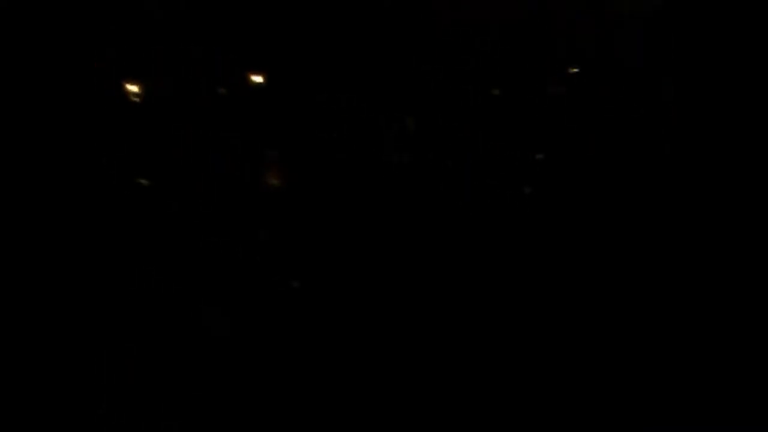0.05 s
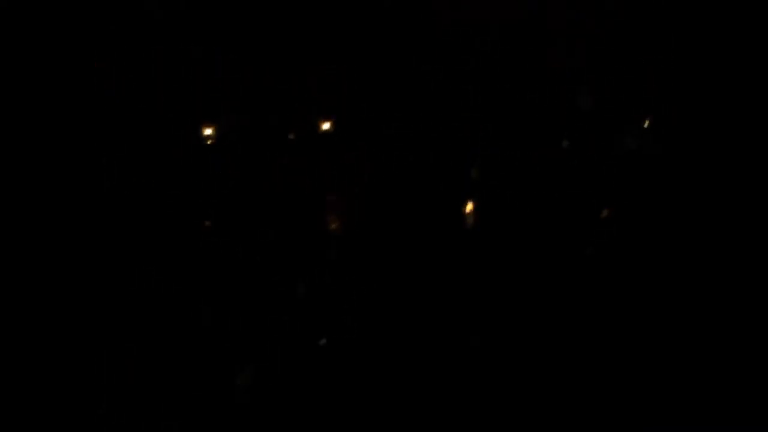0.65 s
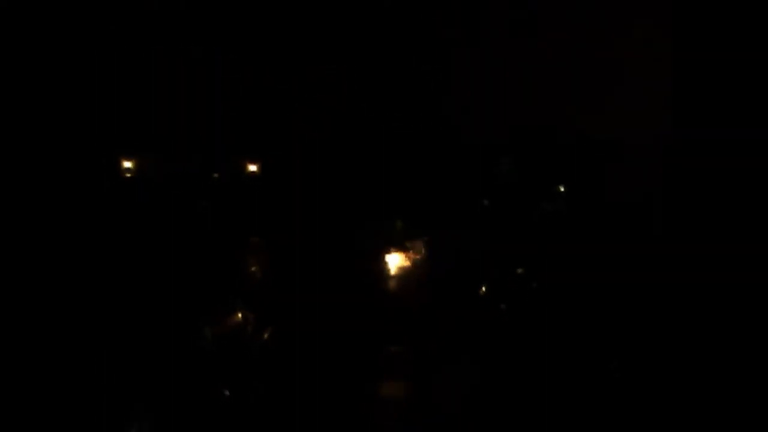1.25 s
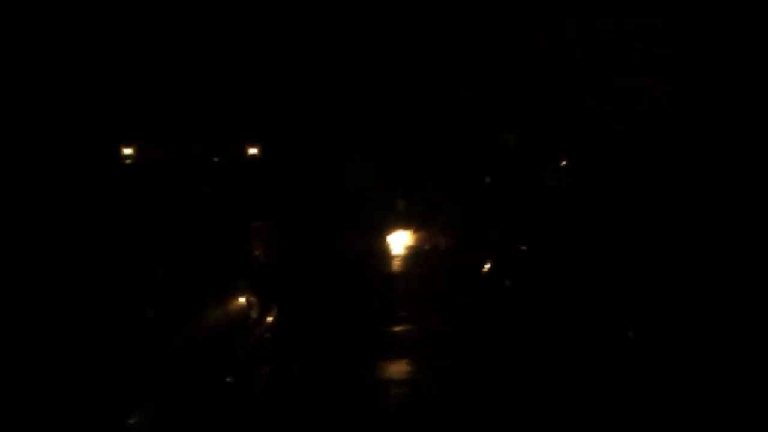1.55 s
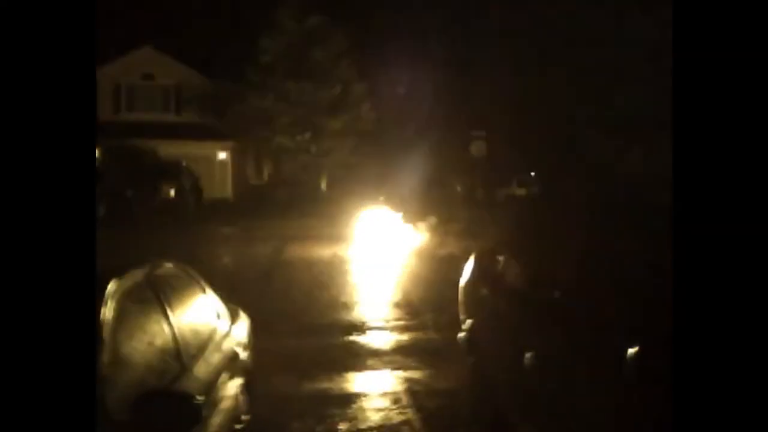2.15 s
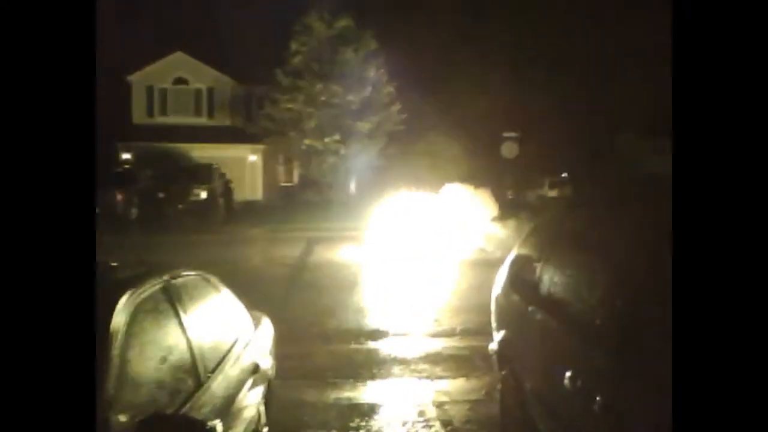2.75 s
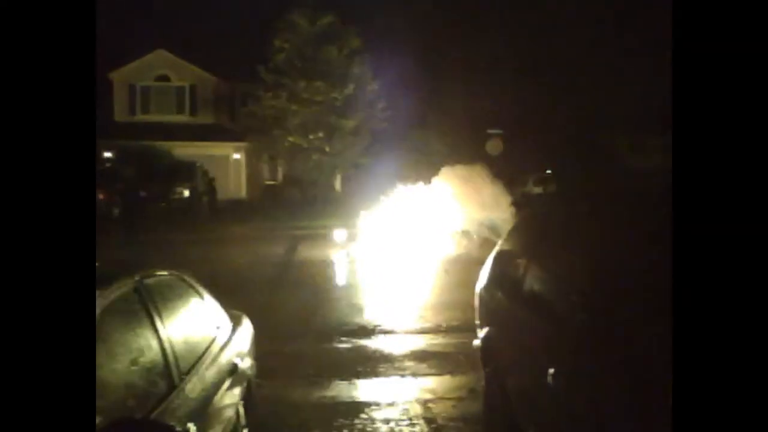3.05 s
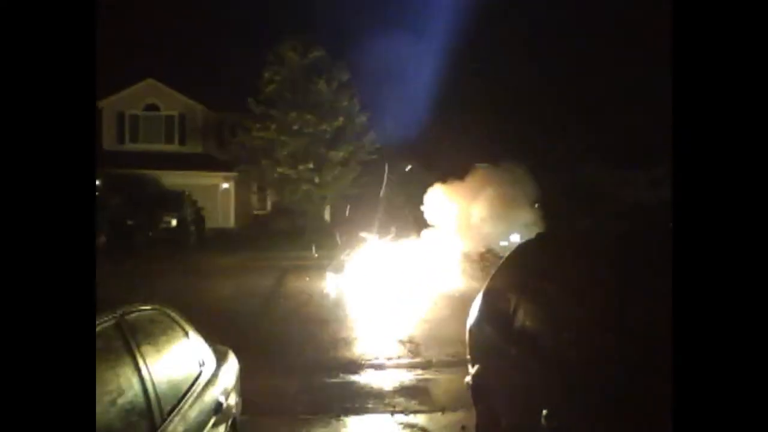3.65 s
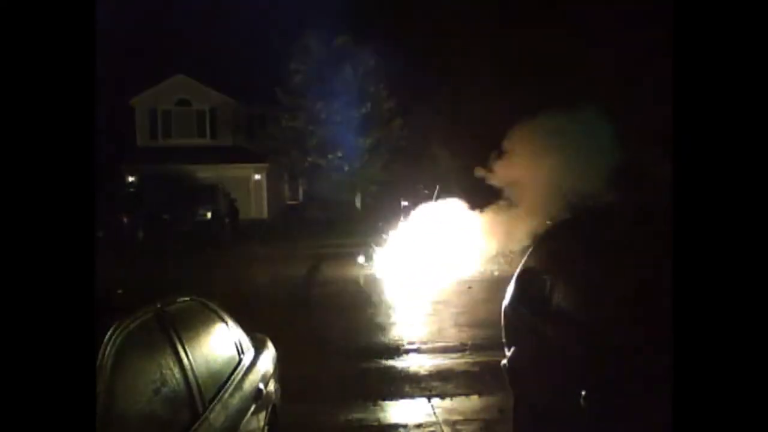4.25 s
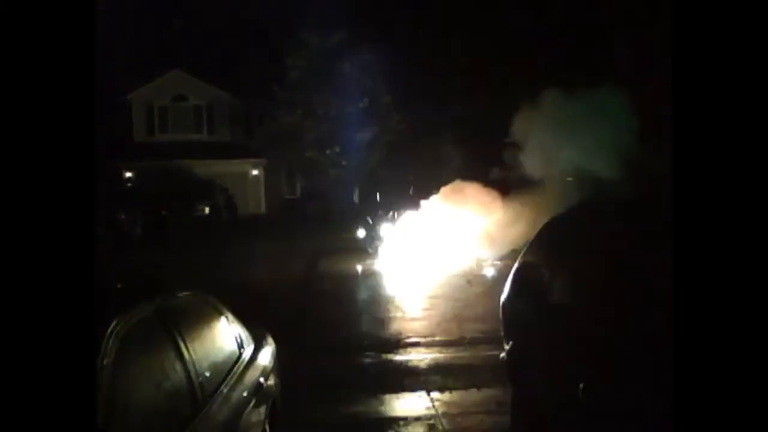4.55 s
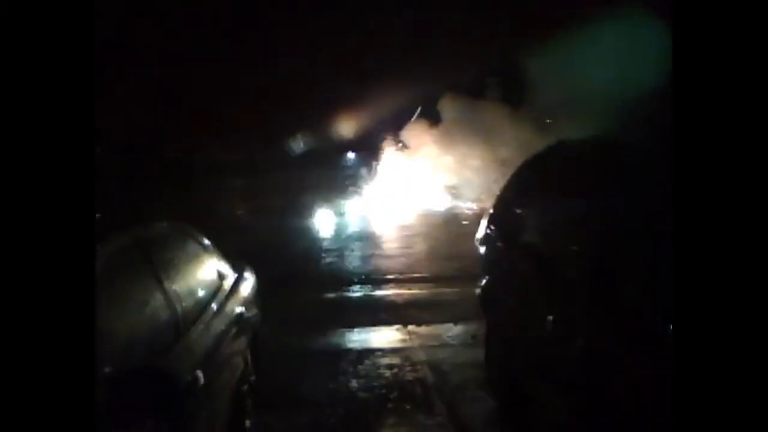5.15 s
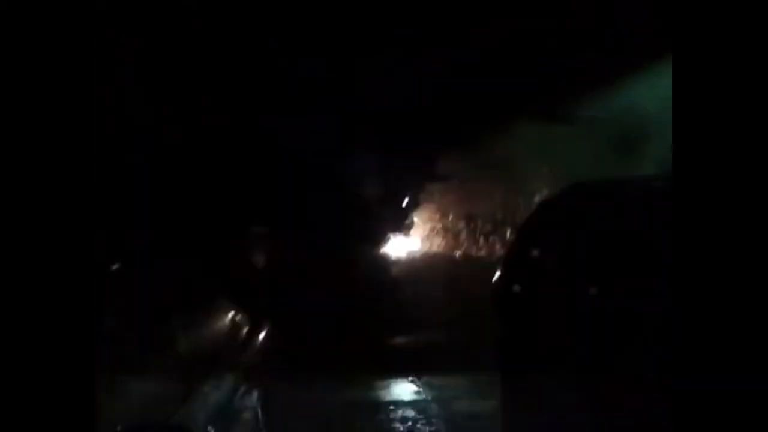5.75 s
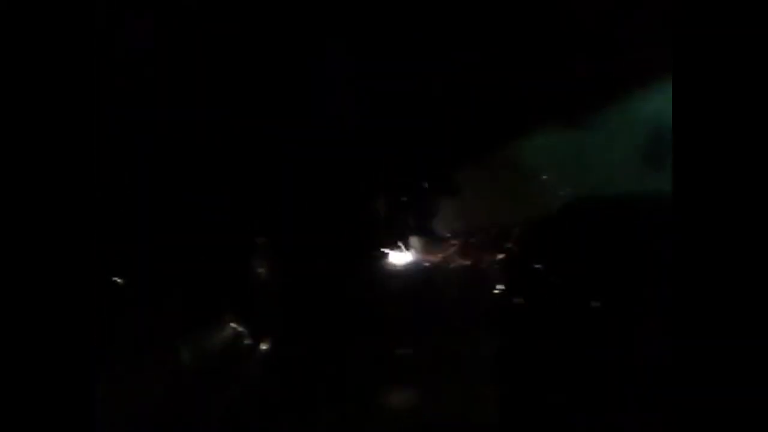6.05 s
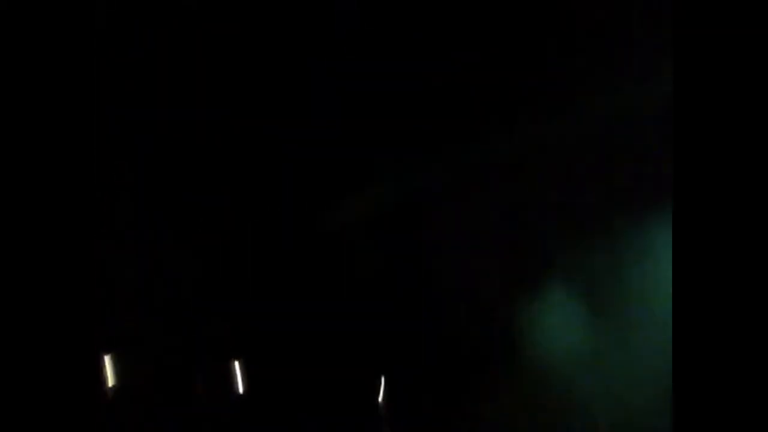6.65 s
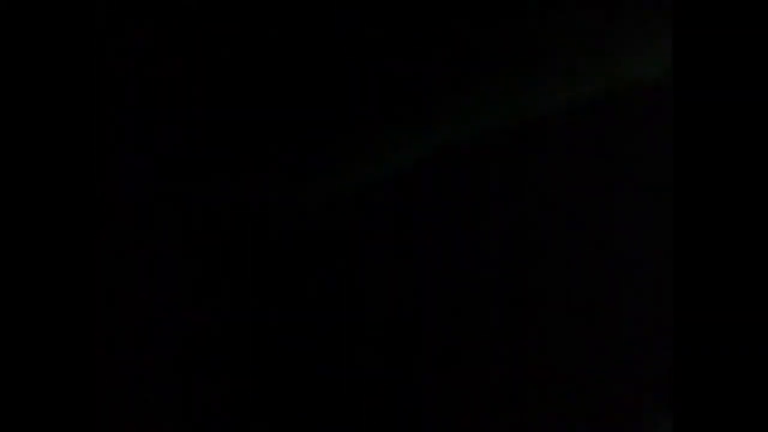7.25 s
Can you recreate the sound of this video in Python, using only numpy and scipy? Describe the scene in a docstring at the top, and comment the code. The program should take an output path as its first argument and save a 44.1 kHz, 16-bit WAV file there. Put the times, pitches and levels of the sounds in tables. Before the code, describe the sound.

In the first second, fingers lightly rub and knock a hand-held mono microphone over faint night air, with one sharper knock near 0.8 seconds. From 1 second, a ground firework close by gives scattered dry snaps that grow louder and thicken. By 2.7 seconds they merge into a loud, dense crackling roar that overloads the microphone and holds until about 5.3 seconds. One brief whistle cuts through near 3.7 seconds, and low wind buffets come and go. From 5 seconds, short, shrill, raspy whistles follow one after another, each falling slightly in pitch. Larger pops cluster between 5.4 and 6 seconds as the crackle dies away. Weaker whistles, a few sharp cracks and small pops continue over thin crackle and a faint rumble until about 7.4 seconds. The bursts and whistles echo briefly off house fronts along the street.

```python
"""A ground firework burns close by on a suburban street at night: single grains snap, then thicken
into a crackling roar. As it thins, whistling tubes fire one after another, each falling in pitch as
its fuel burns down the bore, and larger charges pop. House fronts throw the sound back.
Wind and fingers disturb the hand-held mono microphone, and its amplifier overloads hard.
A faint rumble lies under the last whistles."""
import sys
import numpy as np
from scipy import signal
from scipy.fft import rfft, irfft
from scipy.io import wavfile
from scipy.ndimage import map_coordinates

SR = 44100
rng = np.random.default_rng(int(sys.argv[2]) if len(sys.argv) > 2 else 0)


def to_wav(s):
    """Save 16-bit WAV."""
    ch = np.atleast_2d(s).T  # columns
    pcm = np.round(np.clip(ch, -1, 1) * 32767)  # PCM
    wavfile.write(sys.argv[1], SR, pcm.astype(np.int16))


N = 322812
TIME = np.arange(N) / SR


def from_db(db):
    """Decibels to gain."""
    return 10 ** (np.asarray(db) / 20)


def add(track, start_s, sound):
    """Mix a short sound into a track."""
    start = int(np.clip(round(start_s * SR), 0, N - 1))
    track[start:start + len(sound)] += sound[:N - start]


def swell(centre_s, width_s):
    """Gaussian bump of height 1."""
    return np.exp(-np.minimum((2 * (TIME - centre_s) / width_s) ** 2, 20))


def drift(rate_hz):
    """Ramps between random values, spread about 1."""
    return map_coordinates(rng.standard_normal(N // 8), [TIME * rate_hz], order=1, mode="wrap")


def coloured(x, spectrum, size=4096):
    """Minimum-phase filter from (Hz, dB) rows; white noise keeps its power."""
    hz, db = np.transpose(spectrum)
    grid_hz = np.maximum(np.fft.rfftfreq(size, 1 / SR), 1)
    gain = from_db(np.interp(np.log(grid_hz), np.log(hz), db))
    cepstrum = irfft(np.log(gain))
    cepstrum[1:size // 2] *= 2
    cepstrum[size // 2 + 1:] = 0
    response = irfft(np.exp(rfft(cepstrum)))
    return signal.oaconvolve(x, response / np.linalg.norm(response))[:N]


def noise(spectrum):
    """Steady coloured noise of rms 1."""
    return coloured(rng.standard_normal(N), spectrum)


def ring(clicks, hz, t60_s):
    """Resonator: a unit click starts a decaying sine of height 1."""
    radius, angle = from_db(-60 / (t60_s * SR)), 2 * np.pi * hz / SR
    return signal.lfilter([0, np.sin(angle)], [1, -2 * radius * np.cos(angle), radius ** 2], clicks + 1e-18)


def burst(t60_s, size):
    """Noise decaying from rms 1."""
    return rng.standard_normal(size) * from_db(-60 * TIME[:size] / t60_s)


# Night air. Each row: frequency in Hz, level in dB.
NIGHT_SPECTRUM = [(25, -46), (80, -23), (170, -9), (400, -10), (800, -8), (1500, -12.5), (3000, -16),
                  (6000, -23), (10000, -29), (16000, -40)]

def night_air(level_db=-51):
    """Faint, steady outdoor noise."""
    return from_db(level_db) * noise(NIGHT_SPECTRUM)


# Knocks on the case. Each row: start in seconds, level in dB.
CASE_KNOCKS = [(0.023, -23.5), (0.0793, -12.5), (0.301, -25), (0.386, -19.5), (0.7562, -3), (0.991, -27)]
# Case resonances. Each row: frequency in Hz, level in dB, T60 in seconds.
CASE_MODES = [(1020, -13.5, 0.012), (1370, -11, 0.01), (1840, -8.5, 0.021), (3180, -15, 0.0055),
              (4730, -9, 0.0029)]
# Finger slides. Each row: centre in seconds, width in seconds, rub in dB, swish in dB.
FINGER_SLIDES = [(0.17, 0.077, -36, -48), (0.257, 0.042, -45, -50), (0.418, 0.12, -44, -48),
                 (0.578, 0.043, -47, -60), (0.651, 0.15, -45.5, -43), (0.845, 0.11, -54, -49)]
# Dull rub and bright swish. Each row: frequency in Hz, level in dB.
RUB_SPECTRUM = [(500, -14), (1000, -8), (1500, 0), (1900, 2.5), (2400, -7), (3500, -22), (6000, -28)]
SWISH_SPECTRUM = [(2000, -10), (3200, -3), (4300, 6), (5600, -7), (6600, -6), (8200, -15), (10200, -17),
                  (12000, -21), (15000, -30)]

def handling(bump_s=0.194, bump_db=-15.5, grit_db=3.0):
    """The hand knocks, softly bumps and rubs the microphone's case."""
    clicks, push = np.zeros(N), np.zeros(N)
    for start_s, db in CASE_KNOCKS:
        add(clicks, start_s, from_db([db]))
    knocks = sum((-1) ** k * from_db(db) * ring(clicks, hz, t60_s)
                 for k, (hz, db, t60_s) in enumerate(CASE_MODES))
    add(push, bump_s, from_db([bump_db]))
    bump = ring(push, hz=236, t60_s=0.0073)
    rub, swish = noise(RUB_SPECTRUM), noise(SWISH_SPECTRUM)
    slides = sum(swell(centre_s, width_s) * (from_db(rub_db) * rub + from_db(swish_db) * swish)
                 for centre_s, width_s, rub_db, swish_db in FINGER_SLIDES)
    return knocks + bump + slides * from_db(grit_db * drift(rate_hz=151.7))


# Low rumbles. Each row: centre in seconds, relative level in dB, width in seconds.
LOW_RUMBLES = [(3.632, -16, 0.042), (3.728, 2, 0.024), (3.769, -4, 0.027), (4.064, -8.5, 0.026),
               (4.89, -9.5, .026), (5.36, -5, 0.038), (5.899, -19, 0.056), (5.987, -6, 0.035),
               (6.046, -3, 0.0098), (6.442, -22.5, 0.083), (6.817, -28, 0.17), (7.23, -34, 0.11)]
# Rumble colour. Each row: frequency in Hz, level in dB.
RUMBLE_SPECTRUM = [(15, -4), (50, 6.5), (100, 1), (170, -6.5), (400, -29), (1500, -36)]

def rumbles(level_db=-2):
    """Low rumbles: wind buffets at the microphone, then faint rumbling under the last whistles."""
    envelope = sum(from_db(db + level_db) * swell(centre_s, width_s)
                   for centre_s, db, width_s in LOW_RUMBLES)
    return envelope * noise(RUMBLE_SPECTRUM)


# Echoes off ground, cars and house fronts. Each row: delay in seconds, relative level in dB.
STREET_ECHOES = [(.0035, -28), (.021, -17.5), (.052, -23.5), (.083, -28.5), (.128, -23)]
# Colour of the echoes and tail. Each row: frequency in Hz, level in dB.
STREET_SPECTRUM = [(40, -15), (200, 1), (600, 2.5), (1800, 4), (3200, -0.5), (5000, -1.5), (9000, -5),
                   (16000, -29)]

def street(x, scatter_db=-17, tail_db=-16, houses_db=-4):
    """Bright scatter from nearby things, then duller echoes and a long tail from the houses."""
    near, tail = burst(t60_s=0.19, size=SR), burst(t60_s=1.0, size=SR)
    scatter = signal.fftconvolve(x, from_db(scatter_db) * near / np.linalg.norm(near))[:N]
    response = from_db(tail_db) * tail / np.linalg.norm(tail)
    for delay_s, db in STREET_ECHOES:
        response[int(delay_s * SR)] += from_db(db)
    houses = coloured(signal.fftconvolve(x, response)[:N], STREET_SPECTRUM)
    return scatter + from_db(houses_db) * houses


# Popping charges. Each row: start in seconds, relative level in dB, T60 in seconds.
POP_CHARGES = [(5.416, 10, 0.06), (5.524, 1.5, 0.085), (5.661, 2, 0.12), (5.749, -4, 0.05),
               (5.883, 12, 0.023), (5.957, 6.5, 0.23), (6.04, 9.5, 0.044), (6.350, 1.5, 0.017),
               (6.711, -1, 0.021), (6.835, -3.5, 0.049), (7.181, -6, 0.021)]
# Gas blast. Each row: frequency in Hz, level in dB.
POP_SPECTRUM = [(30, -32), (120, -5), (500, 0.5), (1000, 1.5), (1700, 2.5), (2600, 0.5), (5000, -5),
                (15000, -28)]

def pops(level_db=-3):
    """Larger charges go off with a dull blast of gas."""
    blasts = np.zeros(N)
    for start_s, db, t60_s in POP_CHARGES:
        add(blasts, start_s, from_db(db + level_db) * burst(t60_s, size=16384))
    return coloured(blasts, POP_SPECTRUM)


# Whistling tubes; the shortest are duds. Each row: start in seconds, length in seconds, top and bottom
# of the pitch sag in Hz, chirp time constant in seconds, relative level in dB, fade over the burn in dB.
WHISTLE_TUBES = [(3.66, 0.2, 3074, 2764, 0.0029, -3.5, 5.5), (4.957, 0.16, 3063, 2657, 0.0037, 4.5, 7),
                 (5.02, 0.34, 3162, 2660, 0.0018, 0.5, 4), (5.354, 0.25, 3002, 2577, 0.0029, 3.5, 18),
                 (5.53, 0.32, 3176, 2538, 0.0029, 1, 16), (5.878, .28, 3032, 2773, .009, 2, 16.5),
                 (6.127, 0.035, 3180, 2990, .002, -10, 5), (6.357, .345, 3080, 2540, 0.00202, 0, 12.5),
                 (6.6345, 0.0082, 3490, 3200, 0.0047, -3, 16), (6.714, 0.25, 3145, 2689, 0.0036, -7.5, -2),
                 (6.843, 0.32, 3086, 2623, 0.0018, -3.5, 10), (7.189, .2, 3157, 2707, 0.0085, -1, 5)]
# Gas hiss at a tube's mouth. Each row: frequency in Hz, level in dB.
JET_SPECTRUM = [(200, -18), (1500, -8), (3000, -3), (4500, 4), (6500, 7.5), (10000, -0.5), (16000, -16)]

def whistles(level_db=-2, jet_db=-22, overtones_db=(-14, -21, -28, -35), flutter_db=5, edge_s=0.0033,
             chirp_hz=465, sag_curve=0.8, burnout_share=0.17, burnout_hz=350, burnout_db=-1):
    """Each tube sings at its quarter-wave pitch, which falls as the fuel retreats down the bore."""
    out = np.zeros(N)
    bend = 0.008 * drift(rate_hz=35) + 0.006 * drift(rate_hz=140) + 0.0173 * drift(rate_hz=1500)
    flutter = from_db(flutter_db * drift(rate_hz=150))
    overtone_gains = [from_db(db + flutter_db * drift(rate_hz=130)) for db in overtones_db]
    jet = from_db(jet_db) * noise(JET_SPECTRUM)
    for k, (start_s, length_s, top_hz, bottom_hz, settle_s, db, fade_db) in enumerate(WHISTLE_TUBES):
        t = TIME[TIME < length_s]
        own = slice(k * SR // 2, k * SR // 2 + len(t))   # each tube burns unevenly in its own way
        burnt = t / length_s
        burnout = np.clip(1 - (1 - burnt) / burnout_share, 0, 1) ** 2
        sag_hz = top_hz + (bottom_hz - top_hz) * burnt ** sag_curve
        hz = sag_hz + chirp_hz * np.exp(-t / settle_s) + burnout_hz * burnout
        phase = 2 * np.pi * np.cumsum(hz * (1 + bend[own])) / SR
        rasp = sum(gain[own] * np.sin(n * phase) for n, gain in enumerate(overtone_gains, 2))
        tone = flutter[own] * np.sin(phase) + rasp
        gate = np.clip(np.minimum(t, length_s - t) / edge_s, 0, 1)
        envelope = gate * from_db(level_db + db - fade_db * burnt + burnout_db * burnout)
        add(out, start_s, (tone + jet[own]) * envelope)
    return out


def crack(scatter_db=-21):
    """One grain bursts: a ragged shock and a little scatter, with the energy of 4 ms at rms 1."""
    shock = burst(t60_s=0.003, size=1024) + from_db(scatter_db) * burst(t60_s=0.038, size=1024)
    return shock / np.linalg.norm(shock) * np.sqrt(0.004 * SR)


# Loudest single grains. Each row: start in seconds, level in dB.
LONE_GRAINS = [(1.0196, -37), (1.0312, -17), (1.0822, -28.5), (1.2152, -22), (1.2467, -19), (1.2607, -28),
               (1.2693, -17.5), (1.3242, -29), (1.3454, -24), (1.373, -14.5), (1.3916, -20),
               (1.4513, -30.5), (1.5384, -24.5), (1.5613, -30), (1.6313, -22.5), (1.6715, -18.5),
               (1.693, -4.5), (1.7736, -10.5), (1.7842, -15), (1.797, -12), (1.8598, -21), (1.8778, -9),
               (1.9064, -2.5), (1.9491, -5), (2.0274, -20), (5.8292, -1), (6.127, 4), (6.383, -2),
               (6.637, -2.5), (7.298, -9.5)]
# Lone grain's report. Each row: frequency in Hz, level in dB.
SNAP_SPECTRUM = [(40, -29), (150, -8.5), (330, -10), (600, -0.5), (800, -6), (1450, 0.5), (2300, -1),
                 (2850, -4), (3500, 4), (4800, -1.5), (5700, 1), (8000, -4), (11000, -9), (16000, -12.5)]

def snaps(ring_db=-27, median_hz=3200):
    """Lone grains burst, each a sharp report with a brief pitch of its own."""
    reports = np.zeros(N)
    for start_s, db in LONE_GRAINS:
        shock = crack()
        hz = np.clip(median_hz * 2 ** rng.standard_normal(), 900, 9000)
        report = shock + from_db(ring_db) * ring(shock, hz, t60_s=0.0075)
        report *= np.linalg.norm(shock) / np.linalg.norm(report)
        add(reports, start_s, from_db(db) * report)
    return coloured(reports, SNAP_SPECTRUM)


# The shower catches, roars and burns down.
# Each row: time in seconds, base rate in grains per second, relative grain level in dB.
SHOWER_CURVE = [(0.96, 0, -41), (1.1, 300, -44), (1.64, 344, -40), (1.72, 456, -32), (2.02, 806, -23),
                (2.12, 800, -13), (2.47, 954, -8), (2.75, 1649, 0), (4.35, 1746, 1.5), (5.3, 745, 2.5),
                (5.45, 600.5, -2), (5.68, 500, -8.5), (5.8, 450, -17.5), (6.12, 487, -18), (6.2, 200, -37),
                (6.34, 150, -51), (6.42, 1124, -32), (7.32, 904, -43)]
# Flares as the flame catches. Each row: centre in seconds, boost in dB.
FLAME_FLARES = [(2.18, 11), (2.255, 1.5), (2.319, 12), (2.385, 10)]
# Massed grains. Each row: frequency in Hz, level in dB.
SHOWER_SPECTRUM = [(40, -12), (170, -11), (540, -3.5), (740, -5.5), (850, -2.5), (1000, -4), (1400, -2),
                   (2400, -1.5), (3450, 3.5), (4300, -1.5), (5500, 0.5), (7500, -4.5), (11000, -8.5),
                   (16000, -18)]

def shower(level_db=-8, spread_db=7, clumping_db=2, flare_width_s=0.019, shape_count=144):
    """Grains of varied size and shape burst at random, in clumps, merging into a roar."""
    times_s, rates, levels_db = np.transpose(SHOWER_CURVE)
    grains_per_s = np.interp(TIME, times_s, rates)
    grain_db = level_db + np.interp(TIME, times_s, levels_db)
    grain_db += sum(db * swell(centre_s, flare_width_s) for centre_s, db in FLAME_FLARES)
    fires = rng.random(N) < grains_per_s * from_db(clumping_db * drift(rate_hz=45)) / SR
    grain_db += spread_db * np.clip(rng.standard_normal(N), -2, 2)
    signed_gain = from_db(grain_db) * rng.choice([-1, 1], N)
    shapes = [crack() for _ in range(shape_count)]
    shape_index = rng.integers(0, shape_count, N)
    grains = np.zeros(N)
    for i in np.flatnonzero(fires):
        add(grains, i / SR, signed_gain[i] * shapes[shape_index[i]])
    return coloured(grains, SHOWER_SPECTRUM)


def scene(whistle_send_db=4, beaming_hz=4200):
    """The firework and its echoes, with low rumbles, handling and night air."""
    crackle, whistling, popping = snaps() + shower(), whistles(), pops()
    # Overtones leave a tube as a narrow beam; mainly the fundamental fills the street.
    off_axis = signal.sosfilt(signal.butter(2, beaming_hz, fs=SR, output="sos"), whistling)
    echoes = street(crackle + from_db(whistle_send_db) * off_axis + popping)
    mono = crackle + whistling + popping + echoes + rumbles() + handling() + night_air()
    return np.array([mono, mono])


def record(dry, ceiling=0.45, hardness=8.0, asymmetry=0.033, bass_cut_hz=25, treble_cut_hz=15900):
    """The band-limited amplifier flattens peaks, one side sooner, so loud sounds rumble."""
    oversampled = signal.resample_poly(dry[0], 2, 1)
    limit = ceiling * (1 - asymmetry * np.sign(oversampled))
    clipped = oversampled / (1 + np.abs(oversampled / limit) ** hardness) ** (1 / hardness)
    high_passed = signal.lfilter(*signal.butter(1, bass_cut_hz, "high", fs=2 * SR), clipped)
    low_pass = signal.firwin(255, treble_cut_hz, fs=2 * SR, window=("kaiser", 7))
    mono = signal.resample_poly(high_passed, 1, 2, window=low_pass)
    return np.array([mono, mono])


dry = scene()
out = record(dry)
to_wav(out)
```